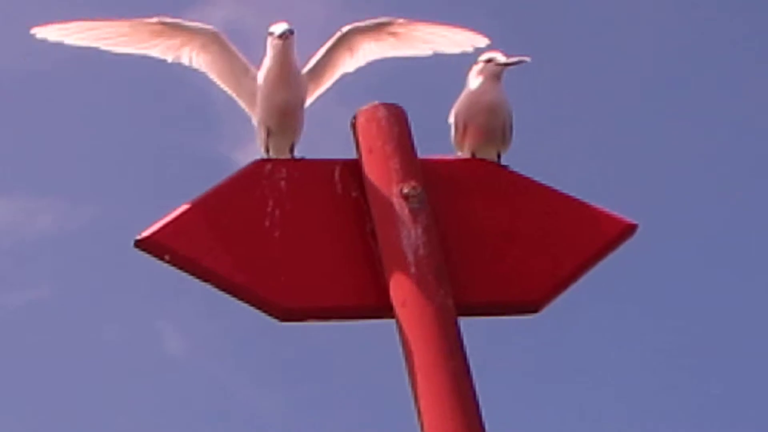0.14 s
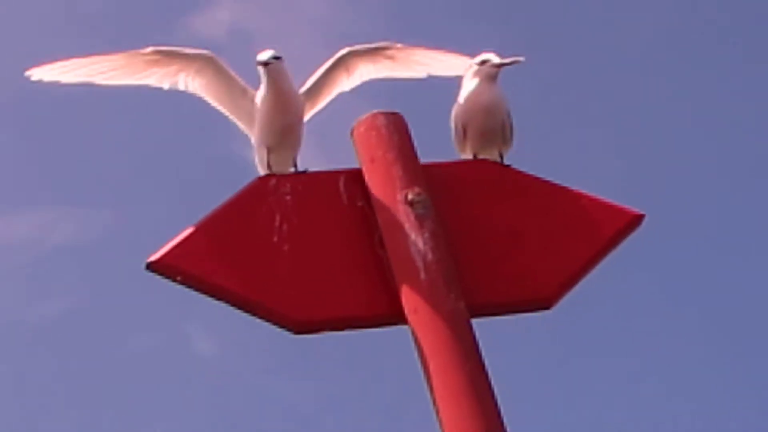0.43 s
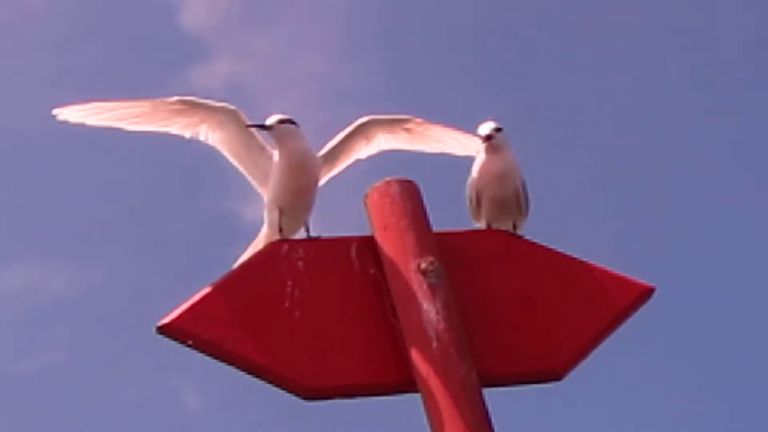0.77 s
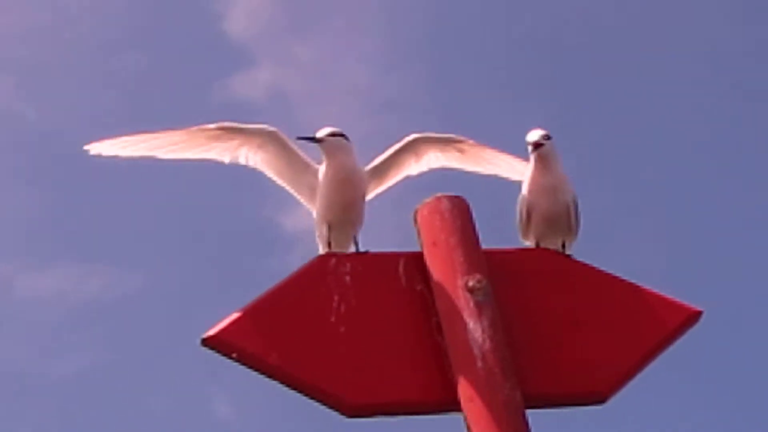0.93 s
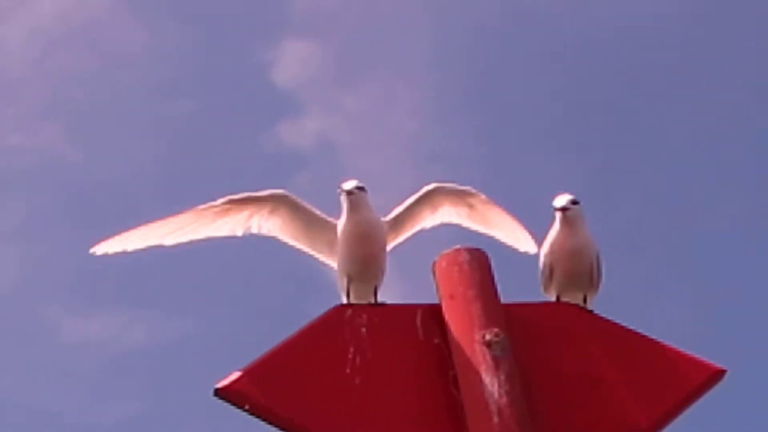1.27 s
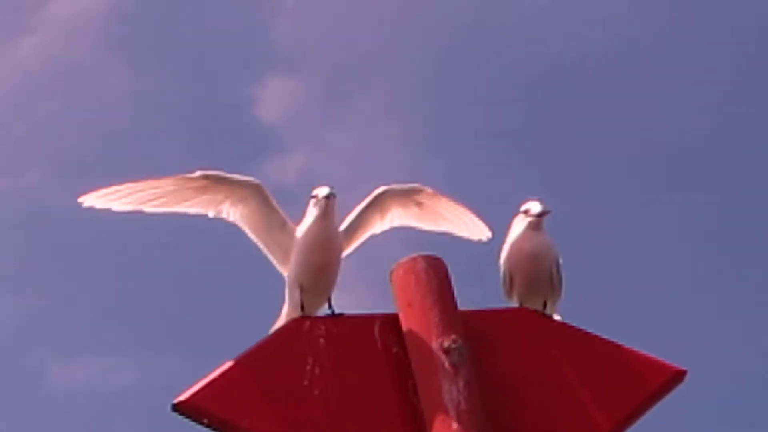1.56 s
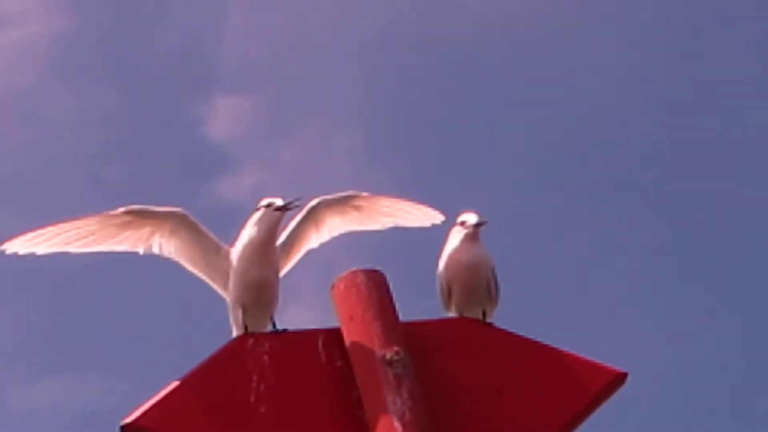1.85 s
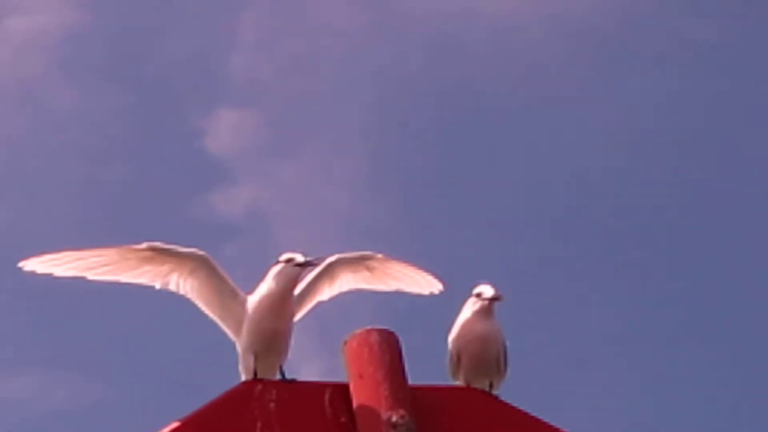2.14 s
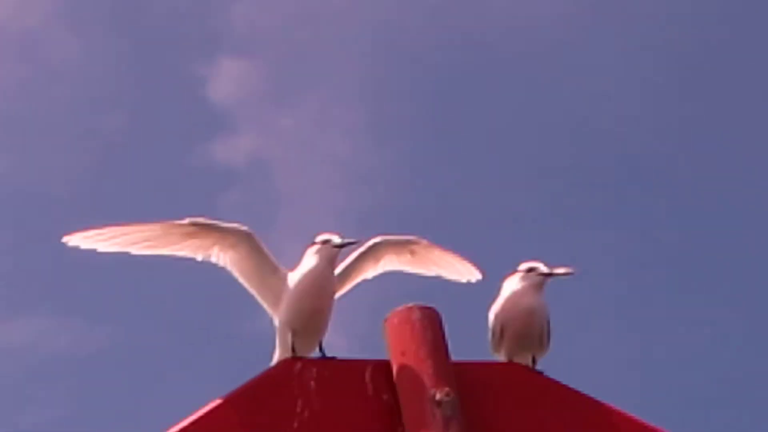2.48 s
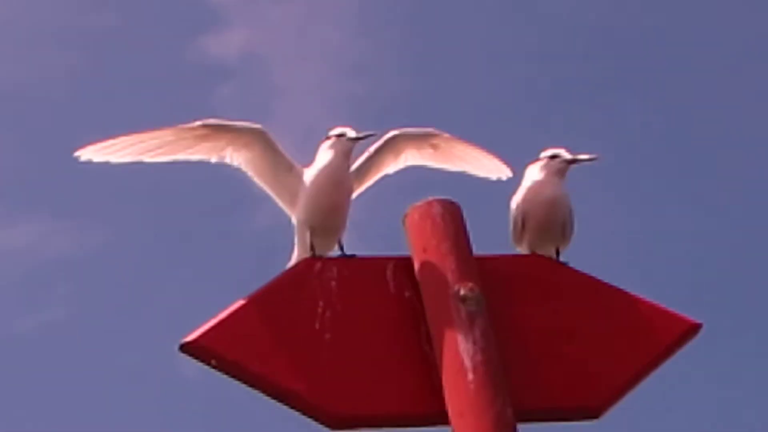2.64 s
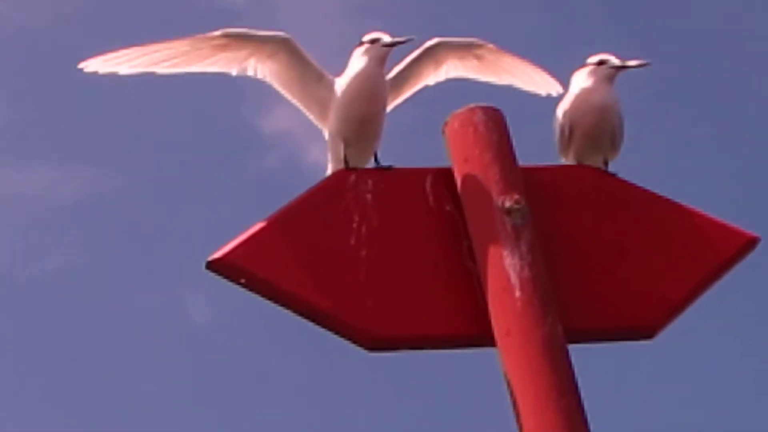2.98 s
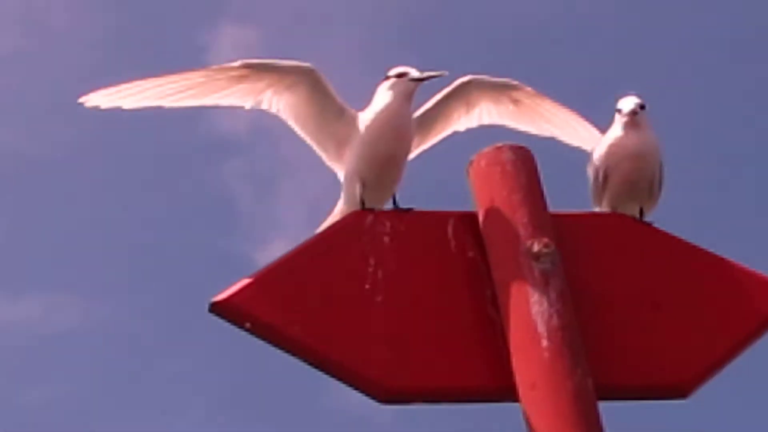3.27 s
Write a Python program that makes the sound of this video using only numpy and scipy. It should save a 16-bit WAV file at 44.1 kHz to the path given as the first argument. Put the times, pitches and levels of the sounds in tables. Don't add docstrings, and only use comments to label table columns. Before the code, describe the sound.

A tern gives three harsh, grating calls, rapid rattling pulses with a bright nasal edge: about 0.1-0.5 s, 0.85-1.25 s, and the loudest at 1.85-2.2 s; none afterwards. Low wind rumbles and thumps on the hand-held microphone throughout. Plastic knocks cluster near 0.3-0.7 and 2.4-2.85 s, with sharp ticks at 1.1 and 1.45. Faint distant water hiss and thin electric whine continue to 3.4 s. Dry, open air.

```python
import sys
import numpy as np
from scipy import signal
from scipy.fft import rfft, irfft, next_fast_len
from scipy.io import wavfile
from scipy.ndimage import uniform_filter1d, map_coordinates

SR = 44100
rng = np.random.default_rng(int(sys.argv[2]) if len(sys.argv) > 2 else 0)


def wrap_up_sound(samples):
    columns = np.atleast_2d(samples).T
    tamed = np.clip(columns, -1, 1)
    steps = np.round(tamed * 32767).astype(np.int16)
    wavfile.write(sys.argv[1], SR, steps)


def nominal_scale(level):
    x = np.asarray(level, float) / 20
    return 10 ** x


N = 150381

# [t/s, level/dB]
WATER_LEVEL = [(0.0, -50.5), (0.94, -52), (3.41, -50.5)]
# [f/Hz, level/dB]
WATER_SPECTRUM = [(100, -3), (300, -5.5), (800, -11), (2000, -11), (3300, -18.5), (6500, -25),
                  (10500, -27.5), (11500, -31.5), (15600, -34.5)]
# [f/Hz, width/Hz, level/dB]
PORT_MODES = [(605, 188, 9), (1101, 357, 10), (1580, 52, 5), (5040, 1180, 9), (7910, 540, 9.5),
              (9770, 870, 5.5), (12700, 120, -9)]
# [f/Hz, level/dB]
WHINE_LINES = [(1102.5, -57), (7717.5, -73), (9922.5, -77)]

# [t/s, level/dB]
WIND_STRENGTH = [(0, -43.5), (.15, -39), (.45, -35.5), (.6, -43.5), (.78, -34.5), (1.4, -41.5),
                 (1.55, -33.5), (1.85, -40), (2.3, -35.5), (2.62, -44.5), (2.82, -39), (3.0, -40.5),
                 (3.41, -37)]
# [f/Hz, density/dB per Hz]
RUMBLE_SPECTRUM = [(8.8, -8), (15, 3), (42, -3.5), (87, -4), (117, -12.5), (500, -28), (650, -36),
                   (1100, -120)]
# [t/s, level/dB, f/Hz]
LOW_PUSHES = [(0.094, -58, 50.6), (0.177, -22.5, 93), (0.223, -25, 64), (0.315, -37, 235),
              (0.382, -24.5, 59.5), (0.447, -19, 125), (0.526, -26.5, 312), (0.686, -27, 308),
              (0.745, -29.5, 57.7), (0.801, -29, 65), (0.994, -30, 79), (1.06, -27.5, 75.5),
              (1.112, -38, 57.7), (1.228, -22.5, 102), (1.277, -29, 76), (2.33, -32, 232), (1.48, -22, 86),
              (1.51, -44, 43.3), (1.534, -36, 91), (1.565, -24, 81), (1.646, -43, 71), (1.732, -24.5, 85),
              (1.964, -26.5, 84), (2.259, -21.5, 71.6), (2.295, -19.5, 62), (2.337, -26.5, 92),
              (2.52, -28.5, 70.6), (2.557, -34, 178), (2.874, -31, 77.5), (3.233, -36, 83),
              (0.172, -25, 228),
    (0.432, -23.5, 110),
    (0.6862, -25.5, 400),
    (2.286, -21, 238),
    (2.315, -24, 152),
    (2.552, -28.5, 314),
]

# [t/s, peak/dB, hollow/dB, bright/dB, fizz/dB]
HOUSING_KNOCKS = [(0.0004, -48.5, -29, 1, -16), (0.3121, -15.5, -5.5, -22, -40), (0.497, -49, 7, 4, -4),
                  (0.5246, -26, -0.5, -16, -11), (0.5272, -13.5, -33, -10.5, -29),
                  (0.5292, -17, -11, -12.5, -49), (0.5336, -20, -11.5, -13, -40),
                  (0.6851, -26.5, -2, -18, -14), (0.8303, -39, -4.5, -3.5, -14),
                  (1.708, -50.5, -17, 4, -11), (2.4121, -26.5, -1.5, -32, -38), (2.4303, -25, -7, -14, -30),
                  (2.5936, -29.5, -14.5, -15, -28), (2.6882, -20, -16, -10, -34),
                  (2.7072, -46, -2, -2, -15), (2.7454, -16.5, -11, -12.5, -37),
                  (2.8056, -41.5, 12, -10, -5.5), (2.827, -21, -14, -12.5, -42),
                  (2.832, -31, -26, -16, -26), (3.078, -48, 0, -10, -0.5), (3.111, -44, 0, -4, -3.5),
                  (3.292, -52.5, -12, 8, -18)]
# [f/Hz, width/Hz, level/dB]
HOLLOW_MODES = [(567.4, 54.5, 14.5)]
SHELL_MODES = [(1054,150,3.5),(1640,88,5),(2033,163,2.5),(2610,156,-10)]
BRIGHT_MODES = [(3780,430,-3.5),(5140,320,0),(5520,275,-0.5)]
FIZZ_MODES = [(7930, 440, 0.82), (9170, 640, -0.69)]
GROUP_LIFT_DB = [10.34, 1.3, 10.4, 9.1]
GROUP_DULL_HZ = [2550, 4560, 6500, 10800]
# [t/s, peak/dB]
TICKS = [
    (1.0869, -15),
    (1.4508, -15.5),
]
# [f/Hz, width/Hz, level/dB]
TICK_MODES = [(1660, 370, 3), (2770, 270, 6), (4100, 140, -6.5), (5870, 340, 2.5)]

# [t/s, pulse rate/Hz, level/dB, gape/0-1, upper resonance f/Hz, upper level/dB]
CALLS = [
    [(.078,258,-55,0,5800,-14),(.1,268,-36.5,0,5850,-10.5),(.15,289,-34.5,0,5850,-11.5),(.26,285,-34,0.06,5740,-11.5),
     (.34,269,-35,.25,5780,-9),(.39,278,-37,1,5750,-6),(.46,223,-39,0.9,5670,-11),(.49,190,-64,1,5700,-17)],
    [(.84,218,-49,0,5850,-10),(.86,224,-40,0,5900,-9),(.9,291,-35,0.1,5900,-12.5),(.97,310,-34,0,5920,-13.5),
     (1.1,313,-34,0.18,5900,-12.5),(1.16,260,-37,0.6,5950,-10),(1.21,226,-42,1,5750,-11),(1.24,180,-62,1,5850,-8)],
    [(1.826,250,-52,0,5700,-14),(1.85,277,-40,0.4,5650,-10),(1.88,272,-35.5,0.22,5630,-12),(1.96,285,-30.5,0.73,5600,-17.5),(2.06,277,-29,0.84,5750,-17.5),
     (2.13,300,-32.5,0.5,5700,-15),(2.17,256,-37.5,0,5650,-15),(2.21,150,-46.5,0,5650,-13),(2.236,170,-59,0,5700,-16)],
]
# [f/Hz, width/Hz, level/dB]
NARROW_THROAT = [
    [(2180,1640,-11),(3113,1280,1.5),(4880,3700,-19.5)],
    [(2330,1110,-3.5),(3210,700,-1),(3890,570,-5.5),(5130,450,-15),(6650,980,-19.5)],
    [(2360,1900,-17),(3020,1600,-4),(4170,1600,-21)],
]
# [f/Hz, width/Hz, level/dB]
GAPING_THROAT = [
    [(2630,1450,-1),(3840,1100,-3),(4900,2500,-31)],
    [(2470,2000,-16),(3000,860,0),(3780,460,2.5),(5130,400,-22),(6500,580,-17)],
    [(2450,2200,-18),(3130,1090,1.5),(4280,1800,-27)],
]
# [f/Hz, width/Hz, level/dB]
TOP_MODES = [(9800,1800,-32),(9800,1400,-29),(8400,1700,-37)]
UPPER_MODE_WIDTH_HZ = [1070, 640, 1240]
THROAT_ORDER = [4, 2, 5]
TIMING_SCATTER = [.035, .025, .025]
BREATH_SHARE = [.09, .06, .025]
# early, weak, smeared pulse [t/s]
TRIPS = [.118,.155,.2,.24,0.251,.305,.326,.356,0.366,0.391,.403,0.435,.443,0.93,0.956,0.971,1.011,1.033,1.058,1.112,
         1.157,1.183,1.877,1.892,1.924,1.943,1.982,1.991,2.015,2.037,2.05,2.08,2.113,2.148,2.176]


def unit(x):
    return x / np.sqrt(np.mean(x ** 2) + 1e-20)


def along(points, hz):
    f, v = np.transpose(points)
    return np.interp(np.log(hz + 1), np.log(f + 1), v)


def curves(rows):
    s, *cols = np.transpose(rows)
    return [np.interp(np.arange(N) / SR, s, c) for c in cols]


def wobble(rate_hz):
    knots = rng.standard_normal(int(N * rate_hz / SR) + 9)
    return map_coordinates(knots, [np.arange(N) * rate_hz / SR])


def filtered(x, gain):
    m = next_fast_len(N + 8192)
    return irfft(rfft(x, m) * gain(np.fft.rfftfreq(m, 1 / SR)), m)[..., :N]


def response(f, modes, order):
    total = 0
    for k, (c, w, db) in enumerate(modes):
        mode = 1j * f * w / (c * c - f * f + 1j * f * w + 1e-9)
        total = total + (-1) ** k * nominal_scale(db) * mode ** order
    return total


def ringing(x, modes):
    return filtered(x, lambda f: response(f, modes, order=1))


def dulled(x, hz):
    return signal.sosfilt(signal.butter(4, hz, fs=SR, output="sos"), x)


def water():
    level_db, = curves(WATER_LEVEL)
    mean_db = level_db.mean()
    z = signal.stft(rng.standard_normal(N), nperseg=512)[2]
    patches = rng.standard_normal(z.shape)
    patches = uniform_filter1d(uniform_filter1d(patches, 8, 0), 8, 1)
    noise = signal.istft(z * nominal_scale(0.94 * unit(patches)), nperseg=512)[1][:N]

    def colour(f):
        port_db = sum(db / (1 + (2 * (f - c) / w) ** 2) for c, w, db in PORT_MODES)
        return nominal_scale(along(WATER_SPECTRUM, f) + port_db) * (f > 90)

    hiss = unit(filtered(noise, colour))
    body = filtered(hiss, lambda f: 1 / (1 + (f / 3000) ** 4))
    treble = hiss - body
    swing_db = level_db - mean_db + 1.2 * wobble(11)
    return nominal_scale(mean_db + 5) * (body * nominal_scale(swing_db) + treble * nominal_scale(0.26 * swing_db))


def whine():
    t = np.arange(N) / SR
    return sum(nominal_scale(db + 1) * np.sin(2 * np.pi * hz * t) for hz, db in WHINE_LINES)


def wind():
    PUFF_CYCLES, PUFF_DB, RAG_DB = 0.5, 1, -11
    t = np.arange(N) / SR
    strength_db, = curves(WIND_STRENGTH)
    noise = rng.standard_normal((2, N))
    rumble = unit(filtered(noise[0], lambda f: nominal_scale(along(RUMBLE_SPECTRUM, f))))
    out = nominal_scale(strength_db - 1 + 2.8 * wobble(11.97) + 3.8 * wobble(29.93)) * rumble
    rag = unit(filtered(noise[1], lambda f: f / 200 / (1 + (f / 200) ** 5.6)))
    for s, db, hz in LOW_PUSHES:
        near = slice(max(int((s - .06) * SR), 0), int((s + .06) * SR))
        cycles = (t[near] - s) * hz
        push = np.cos(2 * np.pi * cycles + rng.uniform(0, 2 * np.pi)) + nominal_scale(RAG_DB) * rag[near]
        out[near] += nominal_scale(db + PUFF_DB) * np.exp(-(cycles / PUFF_CYCLES) ** 2) * push
    return out


def contacts(times_s, levels_db, contact_s=0.0008):
    x, t = np.zeros(N + 512), np.arange(256) / SR
    for s, db in zip(times_s, levels_db):
        grit = rng.standard_normal(256) * t / contact_s * np.exp(-t / contact_s)
        blow = grit + 7 * (t == 0)
        x[round(s * SR):][:256] += nominal_scale(db) * blow / np.linalg.norm(blow)
    return x[:N]


def housing():
    s, peak_db, hollow_db, bright_db, fizz_db = np.transpose(HOUSING_KNOCKS)
    groups = [HOLLOW_MODES, SHELL_MODES, BRIGHT_MODES, FIZZ_MODES]
    spot_db = [hollow_db, 0 * s, bright_db, fizz_db]
    out = np.zeros(N)
    for modes, extra_db, lift_db, hz in zip(groups, spot_db, GROUP_LIFT_DB, GROUP_DULL_HZ):
        blows = contacts(s, peak_db + extra_db + lift_db + 22)
        out += dulled(ringing(blows, modes), hz)
    ticks = ringing(contacts(*np.transpose(TICKS)), TICK_MODES)
    return out + dulled(ticks, 7100) * nominal_scale(16.5)


def terns():
    TRIP_S, TRIP_RUSH, TRIP_DB, TRIP_AIR = .003, .3, -3.5, .42
    DRIFT, SIZE_DB, FALTER = .025, .7, 2.5
    out, t, size = np.zeros(N), np.arange(N) / SR, 512
    f, after_s = np.fft.rfftfreq(size, 1 / SR), t[:size]
    trip = np.clip(sum(np.exp(-((t - s) / TRIP_S) ** 2) for s in TRIPS), 0, 1)
    for k, rows in enumerate(CALLS):
        rate_hz, level_db, gape, upper_hz, upper_db = curves(rows)
        on = (t > rows[0][0]) & (t < rows[-1][0])
        cycle = np.cumsum(rate_hz * (1 + DRIFT * wobble(35) + TRIP_RUSH * trip) * on) / SR
        beats = np.arange(1, int(cycle[-1]))
        late = 1 + FALTER * (beats / len(beats)) ** 4
        timing, strength = rng.standard_normal((2, len(beats)))
        at = np.interp(beats + TIMING_SCATTER[k] * late * timing, cycle, np.arange(N)).astype(int)

        share = BREATH_SHARE[k] * nominal_scale(3.1 * wobble(37.2)[at]) * late + TRIP_AIR * trip[at]
        share = np.clip(share, 0, .95)[:, None]
        decay = np.exp(-after_s * (500 - 280 * trip[at, None])) * (after_s < .007)
        air = rng.standard_normal((len(beats), size)) * decay
        air /= np.linalg.norm(air, axis=1)[:, None]
        source = np.sqrt(1 - share) * (after_s == 0) + np.sqrt(share) * air

        throat = []
        for narrow, gaping in zip(NARROW_THROAT[k], GAPING_THROAT[k]):
            throat.append([a + (b - a) * gape[at, None] for a, b in zip(narrow, gaping)])
        throat.append([upper_hz[at, None], UPPER_MODE_WIDTH_HZ[k], upper_db[at, None]])
        gain = response(f, throat, order=THROAT_ORDER[k]) + response(f, [TOP_MODES[k]], order=3)
        gain = gain / np.sqrt(np.mean(np.abs(gain) ** 2, axis=1))[:, None]

        push_db = level_db[at] + SIZE_DB * late * strength + TRIP_DB * trip[at]
        push = nominal_scale(push_db) * np.sqrt(SR / rate_hz[at])
        rings = push[:, None] * irfft(rfft(source) * gain, size)
        places = at[:, None] + np.arange(size)
        out += np.bincount(places.ravel(), rings.ravel(), N)[:N]
    return out


def scene():
    return (water() + whine() + wind() + housing() + terns())[None]


def roll_off(x):
    return signal.sosfilt(signal.butter(12, 15780, fs=SR, output="sos"), x)


def record(dry):
    mix = filtered(dry, lambda hz: hz < 15700)
    return roll_off(mix)


dry = scene()
out = record(dry)
wrap_up_sound(out)
```